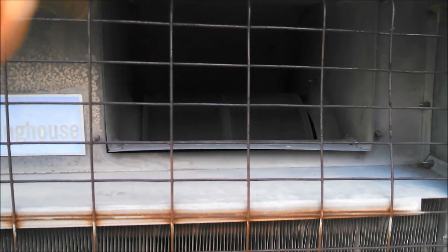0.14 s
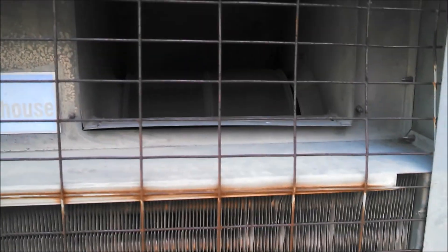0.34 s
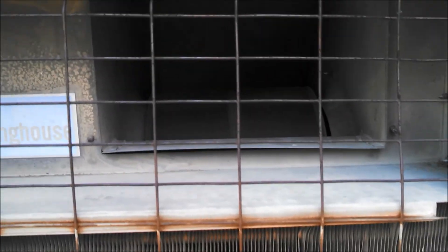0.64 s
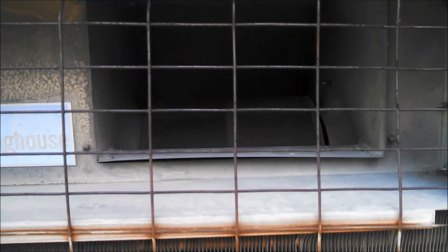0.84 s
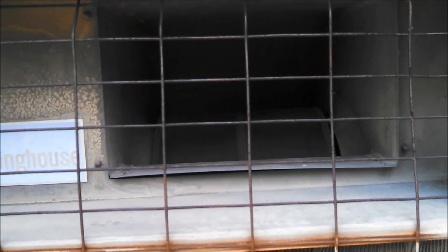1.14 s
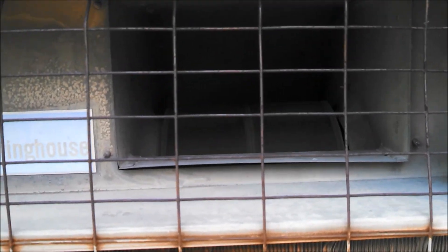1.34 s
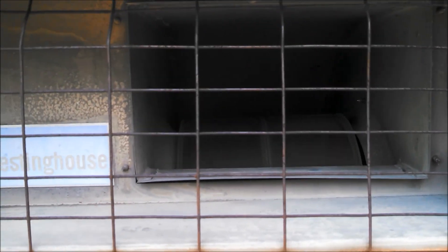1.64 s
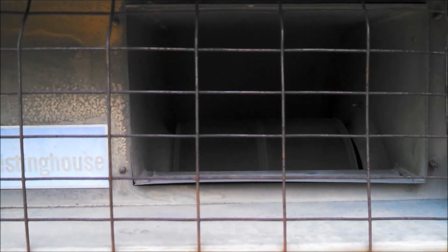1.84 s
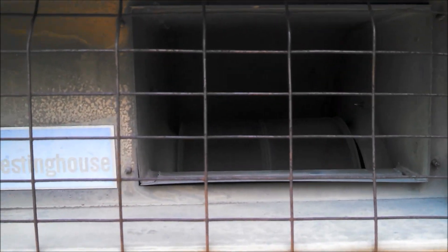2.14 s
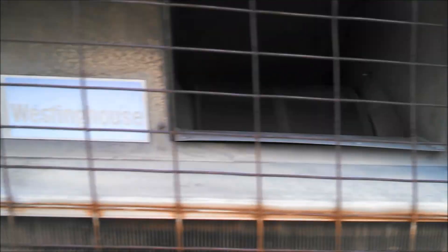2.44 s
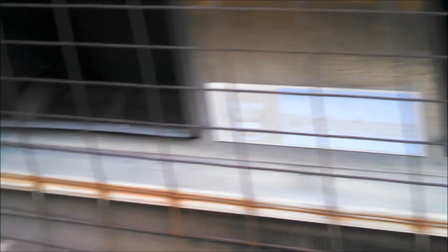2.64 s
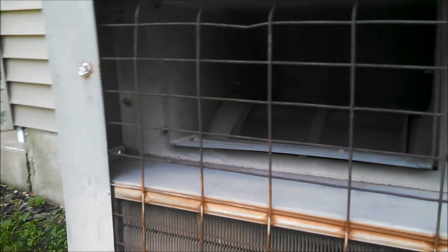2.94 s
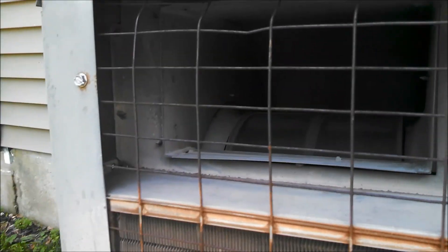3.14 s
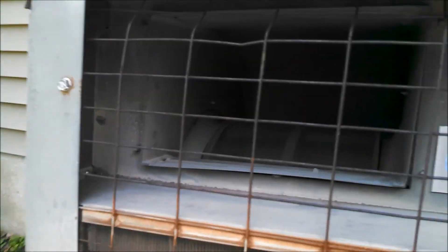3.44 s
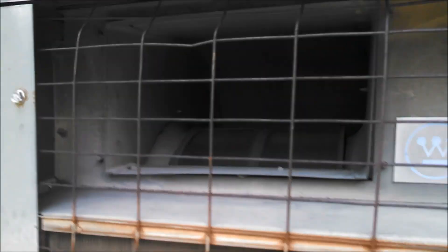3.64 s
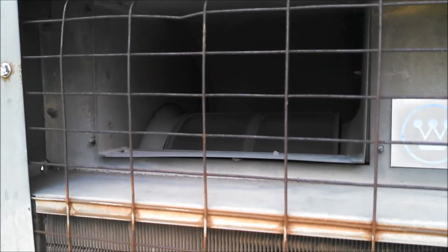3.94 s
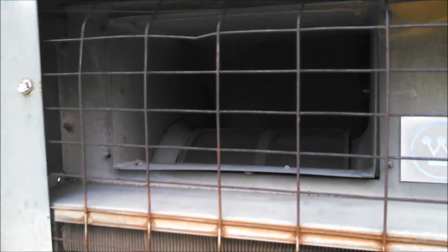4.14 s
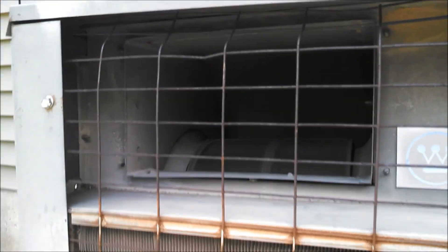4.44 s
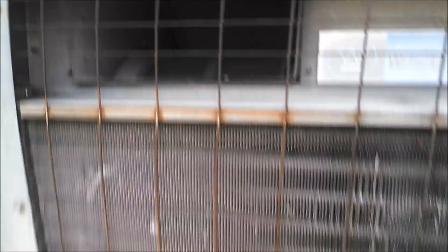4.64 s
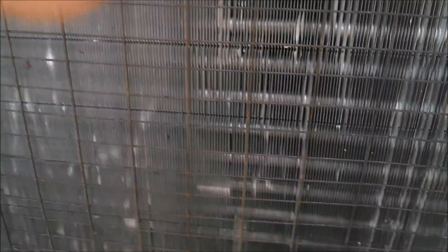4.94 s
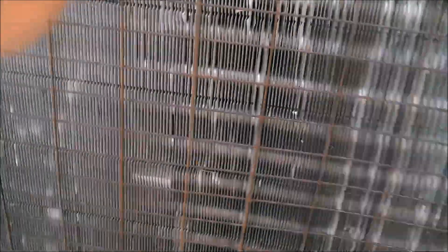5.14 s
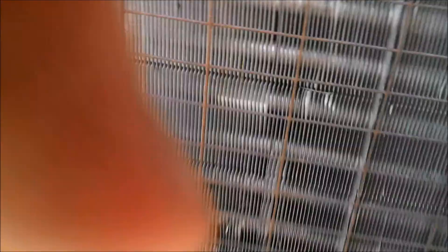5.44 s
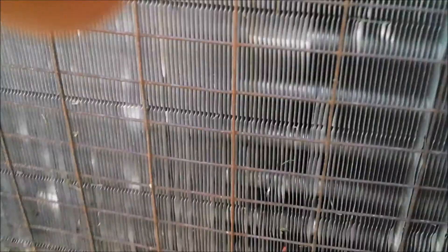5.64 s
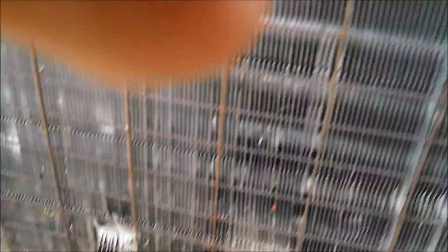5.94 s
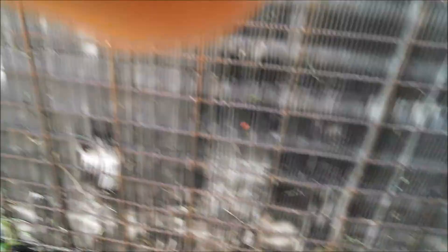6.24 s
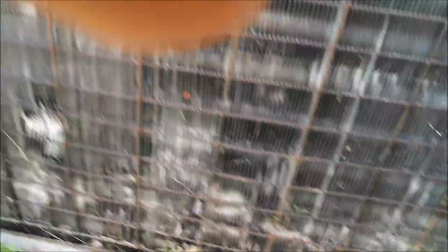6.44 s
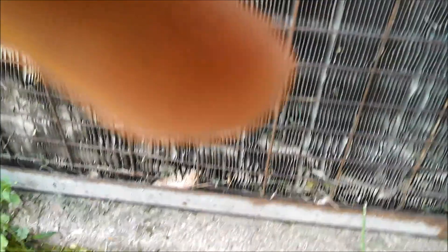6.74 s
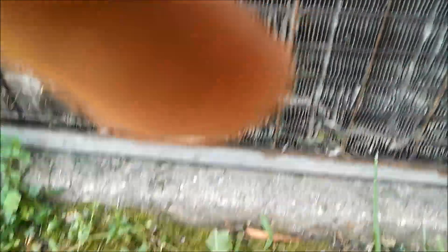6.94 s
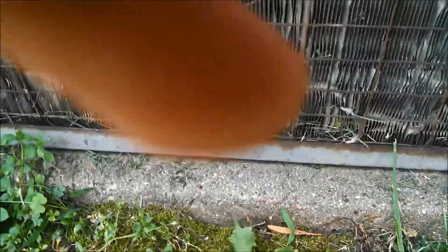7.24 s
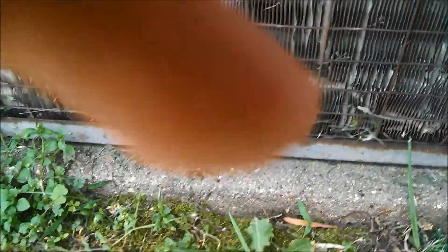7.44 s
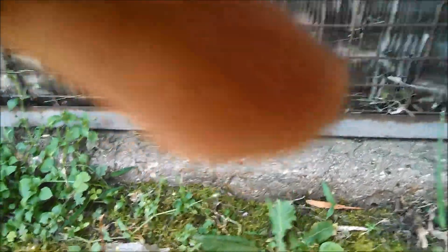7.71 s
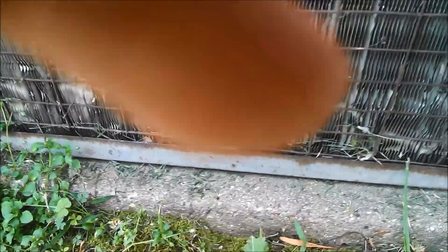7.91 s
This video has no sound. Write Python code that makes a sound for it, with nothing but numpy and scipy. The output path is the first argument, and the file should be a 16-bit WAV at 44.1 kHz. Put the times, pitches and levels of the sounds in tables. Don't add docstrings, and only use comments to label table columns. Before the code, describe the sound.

A handheld stereo microphone sits right in the outlet air of an old window air conditioner outdoors. Violent low buffeting, fast flutter and distorted slaps dominate, slightly rougher and patchier once turned aside. Near six seconds it leaves the jet; the wind collapses and a far quieter blower roar with hiss, metallic resonance and motor hum emerges.

```python
import sys
import numpy as np
from scipy import signal
from scipy.fft import rfft, irfft, next_fast_len
from scipy.io import wavfile
from scipy.ndimage import uniform_filter1d, map_coordinates

SR = 44100
rng = np.random.default_rng(int(sys.argv[2]) if len(sys.argv) > 2 else 0)


def int16_out(signal):
    q = np.round(np.clip(np.atleast_2d(signal).T, -1, 1) * 32767)
    wavfile.write(sys.argv[1], SR, q.astype(np.int16))


def linear_from_db(decibels):
    return 10 ** (np.asarray(decibels, float) / 20)


N = 356063

# (time [s], strength [dB], turbulence above it [dB])
JET = [(0.0, -8.5, -15.5), (0.7, -7, -2), (0.95, -12.5, -6), (1.3, -6.5, -3), (1.6, -9.5, -3.5),
       (2.0, -10, 3.5), (2.55, -8, -2.5), (2.7, -20, -25), (2.8, -16, -11), (2.88, -7, -11), (3.6, -7, -11),
       (4.25, -7, -6), (4.75, -11.5, -12), (5.1, -7.5, -9), (5.63, -13, -3.5), (5.75, -28, -7),
       (6.6, -25.5, 2.5), (8.07, -33, 11)]
# (time [s], length [s], depth [dB])
LULLS = [(0.347, 0.017, -8), (0.535, 0.022, -1.5), (0.602, 0.025, -8), (0.92, 0.085, 2), (1.192, 0.028, -5),
         (1.79, 0.021, -4), (2.295, 0.018, -8), (2.367, 0.029, -6), (2.61, 0.022, -20), (2.717, 0.066, -16),
         (2.785, 0.018, -13), (2.836, 0.019, -7), (3.068, 0.032, -12), (3.36, 0.025, -5),
         (3.433, 0.024, -3), (3.53, 0.03, -8.5), (3.665, 0.018, -8), (3.713, 0.022, -8),
         (3.767, 0.018, -16), (3.903, 0.03, -6.5), (4.356, 0.053, -17), (4.508, 0.023, -7),
         (4.58, 0.0097, -7), (4.642, 0.017, -17), (4.69, 0.024, -14), (4.799, 0.066, -8.5),
         (5.09, 0.021, -9), (5.375, 0.054, -9.5), (5.577, 0.023, -23), (5.683, 0.048, -19)]
# (time [s], length [s], level [dB])
WAFTS = [(6.43, 0.061, 8.5), (6.69, .05, 11), (6.87, 0.042, 6.5), (8.2, 0.24, -9), (7.55, .06, 5),
         (7.78, 0.11, 9.5), (5.95, .2, -5), (2.19, 0.13, 2), (1.44, .08, -2), (1.9, .1, 3), (5.3, .05, 3.5),
         (5.45, 0.051, -0.5)]
# (time [s], length [s], level [dB])
FLUTTER_SWELLS = [(.16, 0.069, 2.5), (.3, 0.066, -4), (.75, .1, -2), (1.2, .1, 1), (1.52, 0.068, -4),
                  (1.7, 0.073, 4), (2.1, .12, -5), (2.45, 0.11, 0), (2.83, .05, -3), (2.92, .05, 6),
                  (3.09, 0.08, -8), (3.26, .07, -7), (3.35, .06, 2), (3.6, .12, 5), (3.76, .06, -2),
                  (4.2, 0.076, -8), (4.62, 0.07, 7), (4.9, .1, -2), (5.23, .06, -3)]
# (time [s], peak [dB],
# spit [dB])
SHARP_EDDIES = [(0.023, -10.5, -27), (0.034, -18, -49), (0.058, -7, -36), (0.108, -16, -43),
                (0.15, -5.5, -34), (0.174, -10, -44), (0.255, -10, -26), (0.329, -18.5, -31),
                (0.387, -10.5, -37), (0.563, -20, -32), (0.625, -16.5, -29), (0.669, -18, -27),
                (0.743, -15, -36), (0.793, -13, -26), (1.041, -15, -39), (1.276, -16, -28),
                (1.293, -14, -25), (1.525, -14, -34), (1.692, -13, -45), (1.839, -10, -22.5),
                (2.078, -30, -33), (2.1, -14.5, -34), (2.144, -17, -23), (2.219, -13, -28),
                (2.379, -15, -37), (2.443, -14.5, -32), (2.478, -9.5, -30), (2.577, -11, -32),
                (2.614, -18, -38),
                (2.856, -14, -31), (2.98, -13.5, -33), (3.057, -16, -27), (3.112, -11.5, -31),
                (3.131, -24, -37), (3.149, -12.5, -32), (3.223, -17, -36), (3.375, -12, -34),
                (3.406, -16.5, -18), (3.548, -15, -27), (3.626, -18.5, -28), (3.776, -12, -25),
                (3.857, -12, -29), (3.885, -17.5, -42), (3.991, -11.5, -28), (4.052, -15.5, -35),
                (4.098, -17.5, -42), (4.156, -22.5, -34), (4.256, -9, -34), (4.342, -21.5, -32),
                (4.401, -21, -39), (4.435, -12, -29), (4.521, -13.5, -43), (4.654, -11, -27),
                (5.026, -17.5, -35), (5.31, -18.5, -39), (5.444, -23, -31), (5.525, -12.5, -48),
                (5.735, -17.5, -22), (6.693, -14, -30),
                (0.084, -14.5, -39), (0.217, -26, -30), (0.28, -23, -33), (0.368, -27, -40),
                 (0.434, -35, -29), (0.451, -17.5, -30), (0.694, -18.5, -30), (0.831, -17, -29),
                 (0.949, -23, -35), (1.061, -20, -40), (1.18, -19, -36), (1.21, -32, -33),
                 (1.256, -24, -31), (1.323, -23.5, -23), (1.343, -14, -31), (1.429, -24.5, -29),
                 (1.497, -12.5, -36), (1.571, -30, -29), (1.595, -24, -31), (1.674, -24, -42),
                 (1.87, -30, -31), (1.891, -23.5, -36), (1.997, -25, -38), (2.018, -23, -32),
                 (2.059, -22, -40), (2.195, -17, -27), (2.265, -12, -28), (2.3, -19, -35), (2.33, -16, -37),
                 (2.366, -15, -42), (2.519, -11.5, -39), (2.642, -19, -28), (3.028, -20, -29),
                 (3.076, -16.5, -27), (3.199, -24, -32), (3.255, -24, -31), (3.274, -24, -30),
                 (3.31, -22, -21), (3.327, -20, -27), (3.46, -15.5, -39), (3.49, -23, -37),
                 (3.561, -16, -33), (3.609, -18, -33), (3.686, -27, -24), (3.719, -19, -29),
                 (3.914, -17.5, -35), (3.975, -29, -39), (4.136, -18.5, -34), (4.176, -16, -27),
                 (4.232, -22, -36), (4.36, -17.5, -39), (4.419, -19, -34), (4.533, -25, -37),
                 (4.72, -17, -26), (4.866, -22.5, -32), (4.892, -20, -30), (4.935, -22, -21),
                 (5.065, -19, -31), (5.122, -22, -30), (5.222, -23.5, -32)]
# (time [s], peak [dB], width [ms])
CRACKS = [(0.0238, -22, 0.85), (0.0588, -14, 1.0), (0.1481, -18, 1.0), (0.1755, -12, 1.0),
          (0.2553, -1.5, 0.94), (0.385, -29, 1.0), (0.5636, -24, 1.0), (0.6669, -25, 1.0),
          (0.7477, -11, 1.0), (0.8315, -26, 1.0), (0.8929, -18, 1.0), (1.0405, -18, 1.0), (1.276, -20, 1.0),
          (1.2965, -23, 1.0), (1.497, -26, 0.98), (1.5259, -21, 0.89), (1.6751, -26, 0.92),
          (1.6751, -21, 0.94), (1.8452, -17, 1.0), (2.1465, -24, 0.8), (2.2184, -17, 0.86),
          (2.3146, -22, 1.0), (2.379, -20, 1.0), (2.4428, -16, 1.0), (2.4793, -18, 0.93),
          (2.5805, -17, 1.0), (2.611, -22, 1.0), (2.8554, -23, 1.0), (2.9801, -19, 0.91),
          (3.1118, -17, 1.0), (3.1353, -18, 1.0), (3.2236, -20, 1.0), (3.3767, -26, 1.0),
          (3.3767, -20, 1.0), (3.4062, -22, 0.92), (3.5478, -21, 0.94), (3.7768, -11, 0.91),
          (3.8561, -32, 0.81), (3.8561, -16, 1.0), (3.916, -29, 1.0), (3.9744, -22, 1.0),
          (3.9933, -13, 1.0), (4.0517, -24, 1.0), (4.0991, -23, 1.0), (4.1565, -27, 1.0),
          (4.2492, -16, 1.0), (4.4358, -18, 1.0), (4.6523, -14, 0.84)]
# (time [s], peak [dB], width [ms])
THUDS = [(0.021, -8, 1.9), (0.107, -19, 1.5), (0.147, -4, 2), (0.217, -16, 2.3), (0.254, -10, 1.7),
         (0.37, -20, 1.9), (0.384, -12, 2), (0.563, -16, 1.9), (0.623, -14, 1.9), (0.739, -15, 1.7),
         (0.796, -18, 1.6), (0.83, -12, 1.9), (1.041, -17, 2.2), (1.177, -19, 1.9), (1.274, -16, 1.8),
         (1.891, -11, 1.9), (1.998, -17, 1.8), (2.025, -9, 2.5), (2.058, -13, 1.6), (2.1, -14, 1.8),
         (2.145, -15, 1.8), (2.165, -18, 1.7), (2.365, -16, 1.7), (2.479, -10, 1.8), (2.519, -7, 2),
         (2.577, -12, 1.8), (2.609, -21, 1.9), (2.854, -17, 1.84), (2.98, -15, 1.9), (3.003, -18, 2.4),
         (3.028, -21, 1.9), (3.056, -14, 1.7), (3.112, -17, 1.4), (3.198, -15, 1.8), (3.256, -18, 1.9),
         (3.329, -16, 1.8), (3.376, -10, 2.1), (3.49, -13, 1.9), (3.546, -18, 2), (3.718, -19, 1.9),
         (3.774, -9, 1.87), (3.846, -19, 1.7), (3.887, -9, 2.3), (3.915, -18, 1.7), (3.973, -20, 1.9),
         (3.992, -10, 2.2), (4.025, -22, 2), (4.051, -13, 2), (4.155, -15, 1.7), (4.215, -19, 1.9),
         (4.234, -14, 1.9), (4.255, -14, 2.3), (4.399, -20, 2.1), (4.419, -13, 1.6), (4.518, -16, 2),
         (4.654, -18, 1.6), (4.866, -22, 1.7), (5.12, -23, 2.2), (5.452, -21, 2.3), (5.526, -14, 2.1)]
# (frequency [Hz], density [dB per Hz])
BUFFET = [(12, -50), (22, -42), (40, -5), (58, 3), (130, -5.5), (210, -16), (330, -24), (600, -57),
          (1500, -120)]
# (frequency [Hz], density [dB per Hz])
FLUTTER = [(60, -51), (150, 1.5), (250, 0.5), (400, -4.5), (600, -17.5), (1100, -34), (2000, -40),
           (5000, -100), (9000, -120)]
# (frequency [Hz], density [dB per Hz])
SNAP = [(150, 3.0), (400, 3.5), (800, -10.0), (1500, -19.5), (3000, -29.0), (6000, -60.0)]
SPIT = [(1500, -5.5), (3500, -8.0), (8000, -22.5), (15000, -31.0)]
OTHER_SNAP = [(150, -19), (400, 6), (800, -8), (1500, -20), (3000, -36), (6000, -66)]
# (time [s], level [dB])
GRILLE = [
    (5.64, -80),
    (5.7, -49),
    (5.75, -43),
    (5.87, -45),
    (5.96, -53),
    (6.15, -80),
]
# (time [s], recorder gain [dB], hiss above roar by view of the coil [dB])
MACHINE = [(0.0, -56, 5), (0.1, -55, -12.5), (1.05, -57.5, -10.5), (1.28, -52.5, -11), (1.5, -56.5, -12.5),
           (2.2, -56, -10.5), (2.5, -56.5, -11.5), (3.6, -56, -11), (4.4, -57.5, -11.5), (5.2, -54, -10),
           (5.62, -51, -10.5), (5.68, -50, -2), (6.1, -44, -9.5), (6.5, -42, -7), (7.0, -40.5, -6.5),
           (7.28, -37.5, -8), (7.48, -42, -8.5), (8.07, -41, -8)]
# (frequency [Hz], density [dB per Hz])
ROAR = [(30, -55), (60, -4.5), (150, -5), (310, -10), (390, -2.5), (700, 0), (1000, -10.5), (2000, -12.5),
        (3000, -15), (4100, -19), (4700, -25), (5500, -24.5), (6500, -32), (9000, -120)]
# (frequency [Hz], density [dB per Hz])
HISS = [(3500, -78), (5200, -1), (6000, -5.5), (7000, -2.5), (10000, -2), (11000, -7), (14000, -11.5),
        (14900, -12), (15400, -44)]
# (frequency [Hz], width [Hz], level [dB])
CABINET = [(123.5, 12, -3), (605, 31, -3), (1109, 49, -4), (1405, 44, -4), (1811, 38, -7),
           (3120, 160, -17.5), (3355, 90, -20), (4010, 78, -26), (5490, 46, -24)]
# (frequency [Hz], rms level [dB])
TONES = [(101, -60), (118.4, -31), (138.5, -38.5), (203, -39), (221.4, -35.5), (240, -36), (290, -45.5),
         (360, -37), (378.3, -35.5), (461.5, -37), (536, -44.5), (619, -39), (810, -39), (876, -45),
         (960, -41.5), (1098, -39.5), (1262, -38), (1421, -46), (1501, -44), (1764, -50), (1964, -46.5),
         (2200, -48), (2374, -61), (2477, -49), (2896, -49), (3058, -47.5), (4032, -58), (4915, -61),
         (5459, -57.5)]
# (time [s], lowest tones [dB], tones near 370 Hz [dB])
HUM = [(0, -3, 1), (5.6, 1, -5), (5.9, 3, -1.5), (6.2, -0.5, 2), (6.5, -1, 0.5), (6.9, -4, -0.5),
       (7.1, -1, -0.5), (7.35, -2.5, -1.5), (7.45, 3, -9), (7.7, 2.5, -7), (8.07, 3, -5)]
# (frequency [Hz], likeness [0 to 1])
ALIKE = [(100, .5), (250, .5), (400, .85), (800, .7), (1300, .96), (2000, .4), (3000, .92), (3700, .6),
         (4400, .78), (5200, .25), (6100, .92)]
# (frequency [Hz], left minus right [dB])
TILT = [(100, 3), (200, -1.5), (500, -4), (1300, -2), (1800, -1.5), (2300, 3.5), (2900, -1), (3500, 3.5),
        (6000, -2)]
# (frequency [Hz], threshold relative to the local level [dB])
FAINT = [(700, -26), (1500, -17), (2500, -11), (3500, -5), (5700, -6), (8000, -2), (11000, 1.5), (15000, 5)]

NEAR_LAG_S, FAR_LEAD_S = 13 / 44100, 18 / 44100
HOP, FRAME_START = 1024, 232


def wind():
    buffet_db, flutter_db = jet()
    speed = wobble(22)
    speed = unit(speed - uniform_filter1d(speed, SR // 6))
    sweep = np.cumsum(np.exp(0.23 * speed))
    sweep = sweep * (N - 1) / sweep[-1]
    buffet = evened(np.interp(sweep, np.arange(N), coloured(BUFFET)))
    flutter = evened(np.interp(sweep, np.arange(N), coloured(FLUTTER)))
    low = linear_from_db(buffet_db + 4.5) * unit(linear_from_db(speed + 0.9 * wobble(12)) * buffet)
    flutter_swing_db = 1.5 * np.tanh(speed) + 3.4 * np.tanh(wobble(90))
    quick = linear_from_db(buffet_db + flutter_db - 5) * unit(linear_from_db(flutter_swing_db) * flutter)

    snap = linear_from_db(3) * eddies(0.0048) * coloured(SNAP)
    spit = linear_from_db(9) * eddies(0.003, spit_share=0.97) * coloured(SPIT)
    shake = linear_from_db(2.5) * np.roll(eddies(0.022), -SR // 150) * coloured(FLUTTER)
    kick = linear_from_db(2.5) * eddies(0.0012, sign=-np.sign(low + quick))
    port = low + quick + kick + shake + snap + spit
    port = filtered(port, lambda hz: above(hz, 40, 32))
    port = port / (1 + np.abs(port / 1.46) ** 4) ** (1 / 4)

    left = filtered(port, lambda hz: -linear_from_db(-4.6) * np.exp(2j * np.pi * hz * NEAR_LAG_S))
    other_swing_db = 3 * np.tanh(speed) + 4 * np.tanh(wobble(60))
    other_port = linear_from_db(buffet_db + flutter_db - 13.5) * unit(linear_from_db(other_swing_db) * coloured(FLUTTER))
    other_snap = linear_from_db(-5) * eddies(0.005) * coloured(OTHER_SNAP)
    return np.array([left + other_port + other_snap + linear_from_db(-5.5) * kick, port])


def jet():
    strength_db, turbulence_db = curves(JET)
    strength_db = strength_db + 1.04 * bumps(LULLS) + bumps(WAFTS) + 0.6 * wobble(6.6)
    return strength_db, turbulence_db + bumps(FLUTTER_SWELLS) + 1.2 * wobble(8)


def eddies(life_s, spit_share=0, sign=1):
    buffet_db, flutter_db = curves(JET)
    when, size = rng.random((2, 900))
    hits = np.zeros(N)
    at = (when * N).astype(int)
    patter_db = buffet_db[at] + 0.5 * flutter_db[at] - 26 - 3.6 * np.log(size + 0.05)
    hits[at] = linear_from_db(patter_db - 27.5 * spit_share)

    s, db, spit_db = np.transpose(SHARP_EDDIES)
    peak_db = db + spit_share * spit_db
    shreds = rng.standard_normal((len(s), 2, 3))
    spread = shreds[:, 0] + 0.5 + 0.423 * np.sign(shreds[:, 0])
    near = (s[:, None] + 0.01234 * spread).clip(0) * SR
    hits[near.astype(int)] = linear_from_db(peak_db[:, None] - 13.5 + 6.2 * shreds[:, 1])
    hits[np.round(s * SR).astype(int)] = linear_from_db(peak_db)
    t = np.arange(SR // 40) / SR
    swell = np.sin(np.pi * np.clip(t / life_s, 0, 1)) ** 2
    return signal.fftconvolve(sign * hits, swell)[:N]


def cracks():
    out, t = np.zeros(N + 400), (np.arange(400) - 200) / SR
    thuds = [(s, db - 4.5, ms) for s, db, ms in THUDS]
    for s, db, ms in CRACKS + thuds:
        u = (t * 1000 * np.pi / np.clip(ms, 0.5, 3)) ** 2
        start = max(round(s * SR + ms * 40) - 200, 0)
        out[start:][:400] -= linear_from_db(db - 0.5) * (1 - 2 * u) * np.exp(-u)
    return out[:N] * linear_from_db([[1.5], [-1.5]])


def machine():
    roar_db, view_db = curves(MACHINE)
    t = np.arange(N) / SR
    cabinet_db = np.interp(t, [5.72, 6.5], [-2.5, 2.5])
    turn = np.sin(2 * np.pi * 18.55 * t + 0.87 * wobble(2.82))
    surge = 0.3 * wobble(7) + 0.5 * wobble(30)
    roar = linear_from_db(roar_db + 17 + surge + 1.3 * turn) * aimed(lambda: coloured(ROAR))
    hiss = linear_from_db(roar_db + view_db + 7 + surge + 2 * turn) * aimed(lambda: coloured(HISS))
    panels = linear_from_db(roar_db + cabinet_db + 12 + surge + 3.7 * turn) * aimed(cabinet)
    motor = linear_from_db(roar_db + cabinet_db + 42.5 + 1.6 * turn) * aimed(tones)
    return roar + hiss + panels + motor


def cabinet():
    air = rng.standard_normal(N)
    total = np.zeros(N)
    for k, (centre, width, db) in enumerate(CABINET):
        ring = lambda f: 1j * f * width / (centre * centre - f * f + 1j * f * width)
        total += (-1) ** k * linear_from_db(db) * np.sqrt(width) * evened(filtered(air, ring))
    return unit(total)


def tones():
    t = np.arange(N) / SR
    low_db, third_db = curves(HUM)
    total = np.zeros(N)
    for hz, db in TONES:
        place_db = low_db * (hz < 150) + third_db * (340 < hz < 400)
        level = linear_from_db(db + place_db + 1.8 * wobble(6))
        total += level * np.sin(2 * np.pi * hz * t + np.clip(hz / 900, 0.55, 1.3) * wobble(13))
    return total


def grille():
    level_db, = curves(GRILLE)
    band = lambda hz: np.exp(-((hz - 6150) / 380) ** 2 / 2)
    return linear_from_db(level_db) * aimed(lambda: unit(filtered(rng.standard_normal(N), band)))


def aimed(make):
    a, b = make(), make()
    lag = lambda hz: (np.pi - 2 * np.pi * hz * 0.94 * NEAR_LAG_S) * above(hz, 1750, 150)
    lead = lambda hz: np.pi + 2 * np.pi * hz * FAR_LEAD_S
    steps = lambda hz: lead(hz) - 0.25 * np.sin(2 * lead(hz))
    path = lambda hz: np.exp(1j * np.where(hz > 5100, steps(hz), lag(hz)))
    treble = lambda hz: 0.94 - 0.4 * np.sin(steps(hz)) ** 4
    likeness = lambda hz: np.where(hz > 6500, treble(hz), along(ALIKE, hz))
    turn = lambda hz: np.arccos(np.clip(likeness(hz), -1, 1)) / 2
    tilt = lambda hz: linear_from_db(along(TILT, hz) * (hz < 6500) / 2)
    mid = filtered(a, lambda hz: np.cos(turn(hz)))
    side = filtered(b, lambda hz: np.sin(turn(hz)))
    return np.array([filtered(mid + side, tilt), filtered(mid - side, lambda hz: path(hz) / tilt(hz))])


def unit(x):
    return x / np.sqrt(np.mean(x ** 2) + 1e-20)


def evened(x):
    span = int(0.036 * SR)
    power = np.abs(uniform_filter1d(uniform_filter1d(x ** 2, span), span))
    return unit(x / (power / power.mean() + 0.044) ** (0.54 / 2))


def along(points, hz):
    f, v = np.transpose(points)
    return np.interp(np.log(hz + 1), np.log(f + 1), v)


def curves(rows):
    s, *cols = np.transpose(rows)
    return [np.interp(np.arange(N) / SR, s, c) for c in cols]


def bumps(rows):
    t = np.arange(0, N, 32) / SR
    total = sum(db * np.exp(-(2 * (t - s) / (length_s + 0.0033)) ** 2) for s, length_s, db in rows)
    return np.interp(np.arange(N) / SR, t, total)


def wobble(rate):
    at = np.arange(0, N + 32, 32)
    knots = rng.standard_normal(N // 200)
    return np.interp(np.arange(N), at, map_coordinates(knots, [at * rate / SR]))


def filtered(x, response):
    m = next_fast_len(N + SR // 2)
    return irfft(rfft(x, m) * response(np.fft.rfftfreq(m, 1 / SR)), m)[..., :N]


def coloured(points):
    return unit(filtered(rng.standard_normal(N), lambda hz: linear_from_db(along(points, hz))))


def above(hz, edge_hz, width_hz):
    return 0.5 + 0.5 * np.tanh((hz - edge_hz) / width_hz)


def scene():
    return wind() + cracks() + machine() + grille()


def thin_treble(pair, weak_db):
    k, n = np.arange(HOP) + 0.5, np.arange(2 * HOP) + 0.5 + HOP / 2
    window = signal.windows.kaiser_bessel_derived(2 * HOP, 4 * np.pi)
    basis = window[:, None] * np.cos(np.pi / HOP * n[:, None] * k) * np.sqrt(2 / HOP)
    count = N // HOP + 3
    sum_and_difference = [pair[0] + pair[1], pair[0] - pair[1]]
    padded = np.pad(sum_and_difference, ((0, 0), (2 * HOP - FRAME_START, 3 * HOP)))
    halves = padded[:, :(count + 1) * HOP].reshape(2, -1, HOP) / 2
    z = np.concatenate([halves[:, :-1], halves[:, 1:]], axis=2) @ basis

    bands = np.repeat((z ** 2).reshape(2, count, -1, 16).mean(axis=3), 16, axis=2)
    hz = k * SR / (2 * HOP)
    covered = (bands < bands[::-1] * linear_from_db(2 * weak_db)) & (hz > 4300)
    covered[0, :, hz > 14500] = True
    chance = np.repeat(rng.standard_normal((2, count, HOP // 16)), 16, axis=2)
    faint = z ** 2 < bands * linear_from_db(2 * (along(FAINT, hz) + 2.5 * chance))

    frames = (z * ~(covered | faint)) @ basis.T
    joined = (frames[:, 1:, :HOP] + frames[:, :-1, HOP:]).reshape(2, -1)
    total, apart = joined[:, HOP - FRAME_START:][:, :N]
    return np.array([total + apart, total - apart])


def top_cut(x):
    return signal.sosfilt(signal.butter(12, 15350, fs=SR, output="sos"), x)


def record(dry):
    top = 0.995
    clipped = dry / (1 + np.abs(dry / top) ** 24) ** (1 / 24)
    thinned = thin_treble(clipped, weak_db=-8.5)
    return top_cut(thinned)


dry = scene()
out = record(dry)
int16_out(out)
```